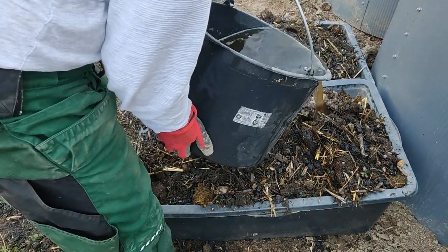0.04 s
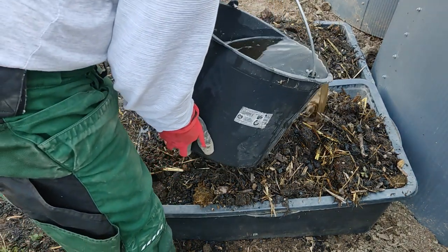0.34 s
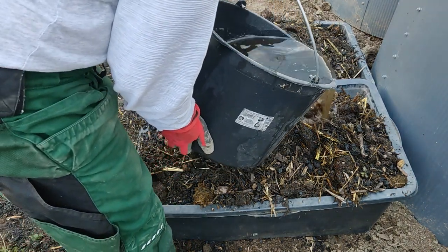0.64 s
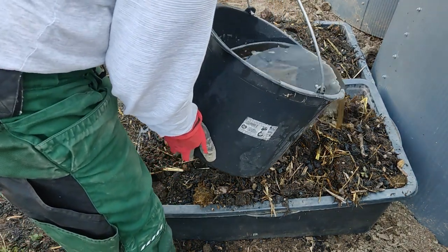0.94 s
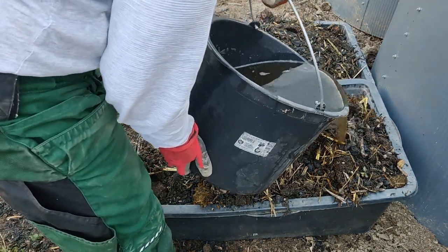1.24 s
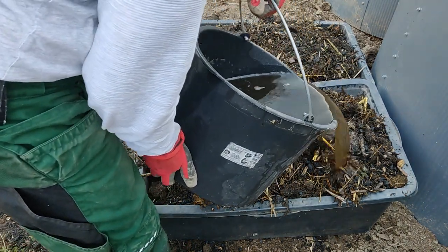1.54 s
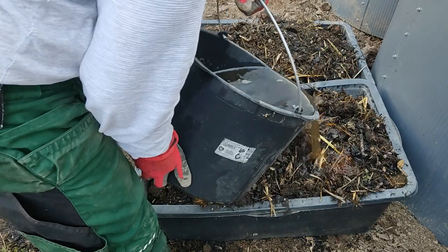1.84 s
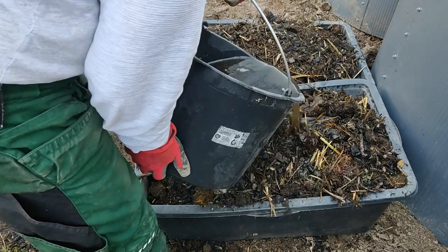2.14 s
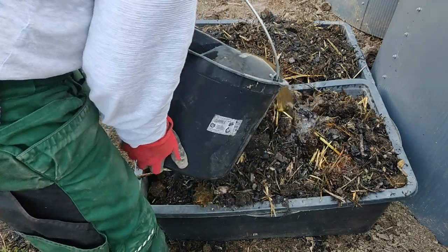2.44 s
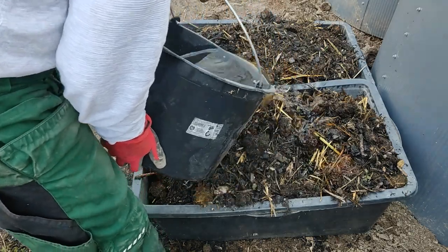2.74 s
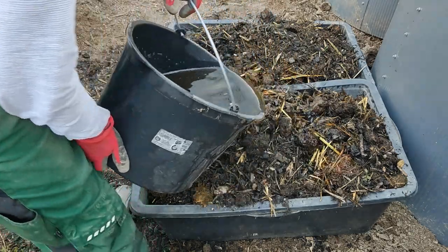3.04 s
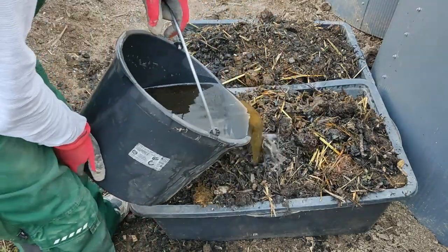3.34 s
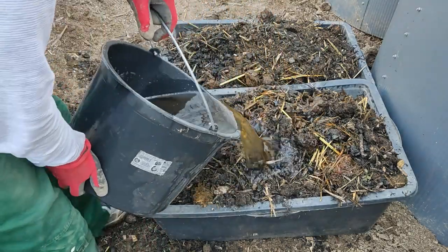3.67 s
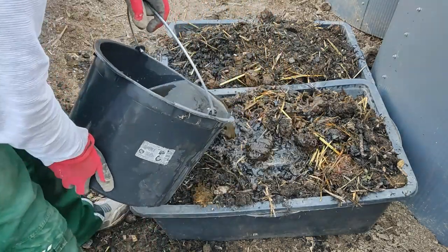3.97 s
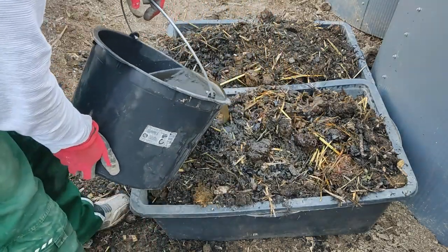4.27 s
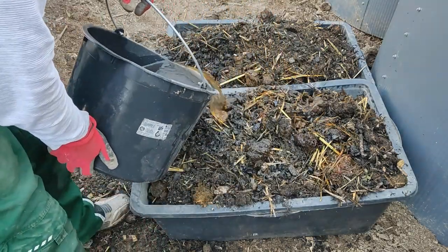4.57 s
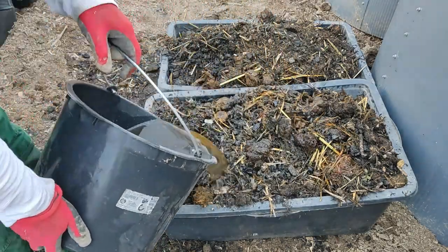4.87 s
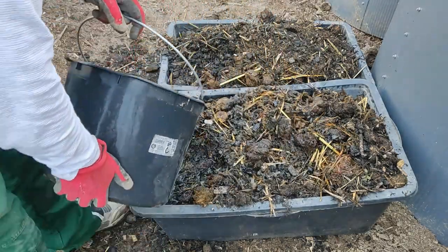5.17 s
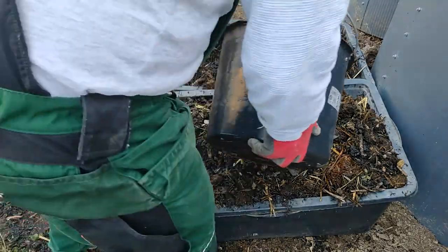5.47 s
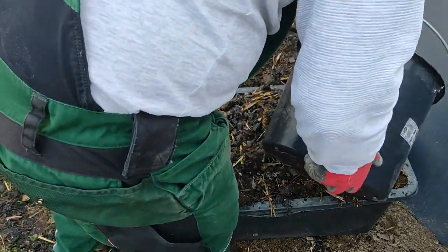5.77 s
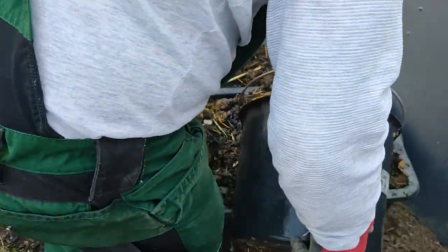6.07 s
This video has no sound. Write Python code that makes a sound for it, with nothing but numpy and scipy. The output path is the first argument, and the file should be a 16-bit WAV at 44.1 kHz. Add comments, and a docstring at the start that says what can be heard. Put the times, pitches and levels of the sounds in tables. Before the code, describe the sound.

Liquid pours from a plastic bucket onto straw and soil in a tub, about an arm's length away, outdoors. From the start it spatters brightly in uneven gushes, with fat drops, gurgling bubbles and a faint drumming on the tub. The flow eases near 3 seconds, a slop thumps softly into the tub at about 3.3, and the splashing swells again briefly. Around 4.6 seconds the stream thins to a quieter, fizzing trickle with ticking drips. From about 5 seconds, sleeve and glove fabric scrape in short rubs while the remaining liquid sloshes in the bucket. The plastic taps lightly at 5.3 and gives a hollow knock at about 6.2 seconds. Throughout, a distant engine revs up and down as a low hum, with a light breeze rumbling on the microphone.

```python
"""Outdoors, an arm's length from a tub of straw and soil: liquid is poured in from a plastic bucket.
The stream spatters on the straw, traps ringing bubbles and drums on the tub, then dies away to a
fizzing trickle. A slop thumps into the tub. As the bucket is swung round, cloth scrapes, the rest of
the liquid sloshes and the plastic knocks. A far engine revs up and down behind a light breeze."""
import sys
import numpy as np
from scipy import signal
from scipy.fft import rfft, irfft
from scipy.io import wavfile
from scipy.ndimage import uniform_filter1d, map_coordinates

SR = 44100
rng = np.random.default_rng(int(sys.argv[2]) if len(sys.argv) > 2 else 0)


def to_wav(s):
    """Save 16-bit WAV."""
    ch = np.atleast_2d(s).T  # columns
    pcm = np.round(np.clip(ch, -1, 1) * 32767)  # PCM
    wavfile.write(sys.argv[1], SR, pcm.astype(np.int16))


N = 278271
TIME_S = np.arange(N) / SR
STREAM_END_S = 4.59


def undb(db):
    """Decibels to gain."""
    return 10 ** (np.asarray(db) / 20)


def unit(x):
    """Scale to rms 1."""
    return x / np.sqrt(np.mean(x ** 2))


def curves(table):
    """Table columns, interpolated linearly over time."""
    time_s, *columns = np.transpose(table)
    return [np.interp(TIME_S, time_s, column) for column in columns]


def colour(x, spectrum, size=8192):
    """Minimum-phase filter through (freq_hz, gain_db) points."""
    hz, db = np.transpose(spectrum)
    log_hz = np.log(np.maximum(np.fft.rfftfreq(size, 1 / SR), 1))
    cepstrum = irfft(np.log(undb(np.interp(log_hz, np.log(hz), db))), size)
    cepstrum[1:size // 2] *= 2
    cepstrum[size // 2 + 1:] = 0
    response = irfft(np.exp(rfft(cepstrum)), size)
    return signal.oaconvolve(np.atleast_2d(x), response[None], axes=1)[:, :N]


def wander(rate_hz):
    """Smooth random drift, rms 1."""
    width = int(SR / rate_hz)
    return unit(uniform_filter1d(uniform_filter1d(rng.standard_normal(N), width), width))


def stereo_noise(side_db):
    """White noise, partly shared by both channels."""
    mid, side = rng.standard_normal((2, N))
    return unit(mid + undb(side_db) * side * np.array([[1], [-1]]))


def pan(pan_db):
    """Channel gains for a left-minus-right level."""
    return undb(np.array([[1], [-1]]) * pan_db / 2)


def add(out, start_s, sound):
    """Mix a sound in at start_s."""
    i = int(np.clip(start_s * SR, 0, N - 1))
    out[..., i:i + sound.shape[-1]] += sound[..., :N - i]


def strays(level_db, count):
    """Random events: start_s, level_db at that moment, three draws in 0-1."""
    return [(when * N / SR, level_db[int(when * N)], *draws) for when, *draws in rng.random((count, 4))]


def bubble(hz, cycles, glide, lag_ms):
    """Trapped air rings and decays, rising in pitch as it nears the surface."""
    t = np.arange(int(3 * cycles / hz * SR)) / SR
    delay_s = np.array([[max(-lag_ms, 0)], [max(lag_ms, 0)]]) / 1000
    turns = hz * np.maximum(t - delay_s, 0)
    age = turns / cycles
    return np.sin(2 * np.pi * turns * (1 + glide * age / 2)) * np.exp(-2 * age) * (1 - np.exp(-turns))


def bubble_crowd(count, low_hz, high_hz, cycles, glide, spread_db, cap, lag_ms):
    """Bubbles of uneven level at random times, small ones more often."""
    out = np.zeros((2, N))
    for when, pitch, size, life, place in rng.random((count, 5)):
        hz = low_hz * (high_hz / low_hz) ** np.sqrt(pitch)
        gain = undb(spread_db * min(-np.log(1 - size), cap))
        add(out, when * N / SR, gain * bubble(hz, cycles * (.5 + life), glide, lag_ms * (2 * place - 1)))
    return unit(out)


def gulps(swells, gain_db, octaves):
    """Swells of bubbles, each crowding round one pitch."""
    out = np.zeros((2, N))
    for peak_s, width_s, hz, db in swells:
        bubbles = bubble_crowd(count=1000, low_hz=hz / 2 ** octaves, high_hz=hz * 2 ** octaves,
                               cycles=7, glide=.03, spread_db=1.5, cap=2, lag_ms=.05)
        out += undb(db + gain_db) * bubbles * np.exp(-((TIME_S - peak_s) / width_s) ** 2)
    return out


def ticks(level_db, rate_hz, thinning, spread_db, cap, scatter_db, scatter_s, lag_ms):
    """Droplets tick on wet straw, fewer at low flow; the tub walls scatter each tick."""
    chance, size, place = rng.random(N), rng.exponential(size=N), rng.standard_normal(N)
    density = np.clip(rate_hz / SR * undb(thinning * (level_db - level_db.max())), 0, 1)
    polarity = np.sign(rng.standard_normal(N))
    hits = (chance < density) * polarity * undb(spread_db * np.minimum(size, cap)) / np.sqrt(density)
    right_arrival = np.clip(np.arange(N) + np.round(place * lag_ms * SR / 1000).astype(int), 0, N - 1)
    direct = unit(np.array([hits, np.bincount(right_arrival, hits, N)]))
    scatter_power = signal.lfilter([1], [1, -np.exp(-1 / (scatter_s * SR))], hits ** 2)
    scatter = np.sqrt(scatter_power) * rng.standard_normal((2, N))
    return direct + undb(scatter_db) * unit(scatter)


def struck_plastic(blows, modes, rattle_db):
    """A blow and a short rattle ring damped modes; soft blows miss the high ones."""
    out, t = np.zeros((2, N)), np.arange(SR // 5) / SR
    for start_s, db, cutoff_hz, rattle_s in blows:
        ring = np.zeros_like(t)
        for hz, mode_db, t60_s in modes:
            gain = undb(mode_db) / np.hypot(1, (hz / cutoff_hz) ** 3)
            ring += gain * np.sin(2 * np.pi * hz * t) * undb(-60 * t / t60_s)
        force = undb(rattle_db) * stereo_noise(side_db=-9)[:, :len(t)] * np.exp(-t / rattle_s) / 2
        force[:, 0] += 1
        add(out, start_s, undb(db) * signal.fftconvolve(force, ring[None]))
    return out


# Open-air spectrum: freq_hz, gain_db
AIR_SPECTRUM = [(15, -0.5), (28, -3), (50, -2.5), (100, -4), (150, -17.5), (300, -19), (700, -21),
                (2000, -28), (6000, -91), (15000, -49)]


def open_air(level_db=-57.5, swell_db=2):
    """Low, gently swelling outdoor rumble."""
    rumble = colour(stereo_noise(side_db=-3), AIR_SPECTRUM)
    return unit(rumble * undb(swell_db * wander(6.7))) * undb(level_db)


# Wind strength: time_s, level_db
WIND_GUSTS = [(0, -46), (.25, -51), (.55, -50), (1.25, -54.5), (1.45, -48.5), (1.8, -50), (2.15, -75),
              (2.45, -44.5), (2.7, -61), (2.9, -48), (3.2, -54), (3.75, -63), (4.3, -55), (4.65, -81),
              (5.0, -63), (5.4, -76), (5.8, -70), (6.3, -53)]


def breeze():
    """Gusts buffet each microphone port independently."""
    spectrum = [(10, 12.5), (24, 5), (45, 5), (80, -6), (200, -22), (600, -55)]
    level_db, = curves(WIND_GUSTS)
    return unit(colour(rng.standard_normal((2, N)), spectrum)) * undb(level_db)


# Engine revs: time_s, firing_hz
ENGINE_REVS = [(0.1, 63.6), (0.25, 56.5), (0.42, 50.6), (0.68, 36.5), (0.95, 40.5), (1.27, 36),
               (1.54, 45.5), (1.78, 46.8), (2.12, 63.6), (2.38, 49.5), (2.5, 47.3), (2.8, 33.4),
               (4.79, 33.6), (4.88, 46), (5.03, 56), (5.34, 55), (5.45, 34.6), (5.63, 48.4), (6.05, 47.8),
               (6.2, 54)]
# Off-throttle spans: start_s, end_s
ENGINE_COASTS = [(.5, 0.89), (2.53, 3.2), (5.36, 5.5)]


def far_engine(level_db=-53, coast_db=-6, third_db=-9, rumble_db=-6, wobble_db=2, muffle_hz=128):
    """Three exhaust harmonics carry this far; fundamental and rumble grow with the revs."""
    firing_hz, = curves(ENGINE_REVS)
    phase = 2 * np.pi * np.cumsum(firing_hz) / SR
    off_throttle = sum(1. * ((TIME_S > start_s) & (TIME_S < end_s)) for start_s, end_s in ENGINE_COASTS)
    coasting = uniform_filter1d(off_throttle, SR // 20)
    rev_gain = (firing_hz / 50.8) ** 3.8
    third_gain = undb(third_db) / np.hypot(1, (3 * firing_hz / muffle_hz) ** 8)
    tone = sum(gain * np.cos(k * phase) * undb(wobble_db * wander(9.6))
               for k, gain in enumerate([rev_gain, 1, third_gain], 1))
    spectrum = [(12, .5), (25, -34), (45, 5), (90, -11.5), (160, -11), (600, -57.5)]
    rumble = rev_gain * unit(colour(stereo_noise(side_db=-13), spectrum))
    return (np.sqrt(2) * tone + undb(rumble_db) * rumble) * undb(level_db + coast_db * coasting)


# Cloth rubs: peak_s, width_s, centre_hz, level_db
CLOTH_RUBS = [(5.037, 0.012, 2700, -49.5), (5.12, .04, 3800, -59), (5.22, 0.035, 2800, -56.5),
              (5.345, 0.012, 3700, -52), (5.40, 0.05, 4300, -57.5), (5.56, .06, 3800, -62),
              (5.8, .06, 3800, -63), (5.97, .07, 3000, -66), (6.16, .03, 3000, -64),
              (6.196, .007, 2300, -60), (6.232, .024, 2200, -57.5)]


def cloth_scrapes(grain_db=3.5):
    """Sleeve and glove rub in short, grainy swells."""
    out = np.zeros((2, N))
    for peak_s, width_s, hz, db in CLOTH_RUBS:
        grains = stereo_noise(side_db=-13) * undb(grain_db * wander(240))
        rub = unit(colour(grains, [(hz / 4, -24), (hz, 0), (hz * 2, -14)]))
        out += undb(db) * rub * np.exp(-2 * ((TIME_S - peak_s) / width_s) ** 2)
    return out


# Sloshes: peak_s, width_s, pitch_hz, level_db
BUCKET_SLOSHES = [(4.94, .03, 1600, -58), (5.045, .022, 1500, -54), (5.22, .03, 1700, -62),
                  (5.352, .016, 1300, -59), (5.585, 0.025, 1060, -66), (5.75, 0.035, 1050, -68)]


def bucket_sloshes():
    """The remaining liquid sloshes in the swung bucket."""
    return gulps(BUCKET_SLOSHES, gain_db=-1, octaves=.59)


# Blows on the bucket: start_s, level_db, cutoff_hz, rattle_s
BUCKET_BLOWS = [(5.338, -61, 900, .01), (5.354, -58.5, 1800, 0.012), (6.2055, -50.5, 1200, 0.014),
                (6.2115, -56, 890, 0.0054), (6.2185, -53, 904, 0.0097), (6.2295, -42.5, 380, 0.006),
                (6.2395, -48, 440, 0.005)]
# Bucket modes: freq_hz, gain_db, t60_s
BUCKET_MODES = [(225, 2, 0.085), (311, 0.5, .07), (370, -3, 0.045), (650, 3, 0.052), (760, -3, 0.031),
                (910, -1, 0.04), (1700, -11, .03), (2300, -11, .02)]


def bucket_knocks():
    """Light taps, then a hollow thud, ring the bucket."""
    return struck_plastic(BUCKET_BLOWS, BUCKET_MODES, rattle_db=-19)


# Slop impacts: start_s, level_db, cutoff_hz, rattle_s
SLOP_BLOWS = [(3.2595, -54, 850, 0.012), (3.266, -55, 1800, 0.018)]
# Tub wall modes: freq_hz, gain_db, t60_s
TUB_MODES = [(135, -7, 0.11), (208, 1, 0.047), (244, -2.5, 0.11), (327, -12, 0.073), (400, -12, 0.051),
             (510, 3, 0.014), (690, 5, 0.03), (800, 5, 0.055), (920, 5, 0.033), (1250, -8, 0.03),
             (1510, -9, 0.022), (2360, 18, 0.025)]


def tub_thump():
    """A slop lands and rings the tub wall."""
    return struck_plastic(SLOP_BLOWS, TUB_MODES, rattle_db=-15.5)


# Filled tub response: freq_hz, gain_db
TUB_SPECTRUM = [(100, -22.5), (165, -9.5), (205, 5.5), (245, -5), (330, -13.5), (425, -23.5), (457, -10.5),
                (490, -18.5), (600, -26.5), (1500, -43)]


def tub_drumming(stream_db=-59, dribble_db=-67, throb_db=2, fade_s=.15):
    """The stream drums on the tub, softer once it thins to a dribble."""
    level_db = np.interp(TIME_S, [STREAM_END_S, STREAM_END_S + fade_s], [stream_db, dribble_db])
    drone = colour(stereo_noise(side_db=-11), TUB_SPECTRUM)
    return unit(drone * undb(throb_db * wander(18))) * undb(level_db)


def dripping(gain_db=-62, onset_s=.39):
    """After the stream thins, soaked straw ticks with drips and bursting froth."""
    drips = ticks(np.zeros(N), rate_hz=220, thinning=0, spread_db=3.6, cap=2.6,
                  scatter_db=-3, scatter_s=.001, lag_ms=.1)
    spectrum = [(1000, -2), (2500, 1), (5000, 0), (9000, -10.5), (15000, 1.5)]
    fade_in = np.clip((TIME_S - STREAM_END_S) / onset_s, 0, 1)
    return colour(drips, spectrum) * undb(gain_db) * fade_in


# Tub resonance swells: peak_s, width_s, pitch_hz, level_db
TUB_RESONANCE_SWELLS = [(0.545, 0.078, 520, -61), (0.884, 0.26, 1130, -54.5), (0.9, 0.34, 456, -64),
                        (1.313, 0.049, 1060, -53.5), (1.954, 0.036, 850, -50), (2.207, 0.054, 813, -57),
                        (2.794, 0.092, 1660, -53.5), (3.44, 0.057, 880, -64.5), (3.752, 0.051, 850, -54.5)]


def tub_resonances():
    """Under the stream, the tub's fixed resonances ring out in narrow swells of bubbles."""
    return gulps(TUB_RESONANCE_SWELLS, gain_db=-2.5, octaves=.2)


# Large bubbles: start_s, pitch_hz, level_db
LARGE_BUBBLES = [(0.045, 2410, -29), (0.592, 1780, -30), (0.896, 1090, -34.5), (1.509, 1910, -31.5),
                 (1.935, 1160, -35.5), (2.216, 1090, -35.5), (2.78, 1740, -39), (2.87, 1630, -31.5),
                 (3.077, 1600, -38), (3.42, 880, -43), (3.904, 1680, -36.5), (3.921, 1080, -36),
                 (4.051, 1770, -35), (4.584, 990, -44), (4.699, 1320, -40), (4.782, 2770, -37),
                 (4.836, 920, -49), (4.898, 940, -42.5), (5.026, 2030, -40), (5.501, 840, -48.5),
                 (5.576, 1100, -41.5), (5.713, 1410, -35), (6.263, 2640, -38)]


def plops(gurgle_db, low_hz=1100, high_hz=2000, stray_db=8, spread_db=6):
    """Single large bubbles ring above the gurgle; weaker ones come at random."""
    out = np.zeros((2, N))
    weaker = [(start_s, low_hz * (high_hz / low_hz) ** pitch, db + stray_db - spread_db * weakness)
              for start_s, db, pitch, weakness, _ in strays(gurgle_db, count=70)]
    for start_s, hz, db in LARGE_BUBBLES + weaker:
        add(out, start_s, undb(db) * bubble(hz, cycles=11, glide=.052, lag_ms=.045))
    return out


# Puddle spectrum: freq_hz, gain_db
GURGLE_SPECTRUM = [(200, -23.5), (400, -10.5), (720, -17.5), (1150, -6), (2400, 1.5), (3500, 3.5),
                   (6000, 2.5), (12000, -59)]


def gurgle(level_db, gain_db=1.52, churn_db=9.5, clump_db=2):
    """The stream folds air into the puddle: short bubbles amid churning liquid."""
    bubbles = bubble_crowd(count=3200, low_hz=459.4, high_hz=2592,
                           cycles=16.5, glide=.087, spread_db=-4, cap=1.8, lag_ms=.12)
    churn = stereo_noise(side_db=-3) * undb(clump_db * wander(33))
    mix = unit(colour(bubbles, GURGLE_SPECTRUM)) + undb(churn_db) * unit(colour(churn, GURGLE_SPECTRUM))
    return unit(mix) * undb(level_db + gain_db)


# Pop clusters: start_s, level_db, centre_hz
WET_POPS = [(.032, -35, 2700), (.0605, -41, 3000), (.089, -36, 4600), (.182, -43, 2400), (.3155, -46, 3000),
            (.4284, -42, 2500), (.506, -41, 3900), (.6255, -44, 3000), (1.211, -46, 1400),
            (1.2958, -42, 3200), (1.3585, -42, 3400), (1.416, -40.5, 3500), (1.654, -43, 3000),
            (1.715, -47, 1300), (2.003, -41, 1900), (2.007, -44, 1100), (2.346, -44, 3200),
            (2.47, -44, 3800), (2.512, -44, 2500), (2.619, -42, 4100), (2.66, -45, 3300), (2.99, -48, 4600),
            (3.15, -46, 4400), (3.263, -44, 1300), (3.4385, -42, 3600), (3.722, -42, 2900),
            (3.752, -41, 4000), (3.805, -39, 3000), (3.818, -42, 3400), (4.319, -43.5, 4700),
            (4.393, -45, 3000), (4.6835, -49, 3500), (4.8537, -48, 4500), (4.9815, -41, 3800),
            (5.058, -53, 1200), (5.1015, -51, 3500), (5.249, -53, 1600), (5.318, -53, 2800),
            (5.357, -53, 2200), (5.473, -55, 2000), (5.5445, -53, 4200), (5.578, -53, 4300),
            (5.62, -56, 2500), (5.765, -55, 4800), (5.86, -56, 3800), (6.055, -57, 2100),
            (6.088, -55, 4200), (6.263, -50, 2800)]


def wet_pops(count=7, stagger_s=.0031, octaves=.31, rms_window_s=.005):
    """Short clusters of mid-pitched pops in the pour."""
    out = np.zeros((2, N))
    for start_s, db, centre_hz in WET_POPS:
        cluster = np.zeros((2, SR // 20))
        for k, (wait, pitch, place) in enumerate(rng.random((count, 3))):
            hz = centre_hz * 2 ** (octaves * (2 * pitch - 1))
            pop = bubble(hz, cycles=5, glide=.21, lag_ms=.12 * (2 * place - 1))
            add(cluster, k * wait * stagger_s, pop / (1 + k / 2))
        rms = np.sqrt(np.sum(cluster ** 2) / (2 * rms_window_s * SR))
        add(out, start_s, undb(db) * cluster / rms)
    return out


# Coarse drop spectrum: freq_hz, gain_db
CRACKLE_SPECTRUM = [(300, -25.5), (800, -7), (2000, 3.5), (3000, -3), (4200, 4), (6500, 11), (9000, -7),
                    (15000, -18.5)]
# Coarse patter level against the rest of the pour: time_s, offset_db
CRACKLE_LEVEL = [(0, -4), (.3, -4.5), (.55, -5), (1.1, -0.5), (1.55, -1.5), (1.9, -14), (2.08, -2),
                 (2.45, -0.5), (3.0, 1.5), (3.33, 1), (3.62, -3.5), (3.8, -0.5), (4.4, 2), (4.7, 1),
                 (4.95, 1.5), (5.6, -0.5), (6.3, 3)]


def crackle(spray_db, gurgle_db, beads_db=-1.5, clump_db=3.1):
    """Coarse drops patter and trap small beads of air."""
    offset_db, = curves(CRACKLE_LEVEL)
    level_db = (spray_db + gurgle_db) / 2 + offset_db
    patter = ticks(level_db, rate_hz=600, thinning=.3, spread_db=3.6, cap=2.4,
                   scatter_db=-5, scatter_s=.0015, lag_ms=.02)
    beads = bubble_crowd(count=1500, low_hz=2200, high_hz=6400,
                         cycles=10, glide=.02, spread_db=2.8, cap=2.4, lag_ms=.06)
    mix = unit(colour(patter, CRACKLE_SPECTRUM)) + undb(beads_db) * beads
    return unit(mix * undb(clump_db * wander(19))) * undb(level_db)


# Fine droplet spectrum: freq_hz, gain_db
SPRAY_SPECTRUM = [(1500, -67), (4000, -9), (6000, -13), (8000, 4.5), (15000, -2)]


def spray(level_db, gain_db=-3, froth_db=-3.5, clump_db=1):
    """Fine droplets tick and froth pings; full flow blurs them into a hiss."""
    fizz = ticks(level_db, rate_hz=6000, thinning=.8, spread_db=3, cap=3.2,
                 scatter_db=4, scatter_s=.0022, lag_ms=.12)
    froth = bubble_crowd(count=3000, low_hz=6000, high_hz=14000,
                         cycles=22, glide=.01, spread_db=3.2, cap=2.8, lag_ms=.15)
    mix = unit(colour(fizz, SPRAY_SPECTRUM)) + undb(froth_db) * froth
    return unit(mix * undb(clump_db * wander(61))) * undb(level_db + gain_db)


def drop_envelope(attack_ms=.17, decay_ms=.62, second_ms=1.4, second_db=-11, spray_ms=4, spray_db=-27):
    """A drop bursts, strikes a second stalk and throws a little spray."""
    t_ms = np.arange(SR // 20) * 1000 / SR
    first, second = [(1 - np.exp(-age_ms / attack_ms)) * np.exp(-age_ms / decay_ms)
                     for age_ms in (t_ms, np.maximum(t_ms - second_ms, 0))]
    return first + undb(second_db) * second + undb(spray_db) * np.exp(-t_ms / spray_ms)


# Fat drops on straw: start_s, level_db, body_db, pan_db
FAT_DROPS = [(.0892, -13.5, -16, -7), (.162, -22, -20, 0), (.436, -21, -18, 0), (.457, -21, -16, 3),
             (.4637, -15.5, -16, 3), (.6238, -15, -21, -7), (.78, -22, -23, -3), (.7832, -14, -19, 0),
             (.787, -20, -24, 0), (.797, -22, -22, 0), (.9816, -23, -22, 0), (1.0624, -20.5, -22, 0),
             (1.181, -23.5, -23, 0), (1.235, -22, -15, -9), (1.422, -20.5, -23, -1), (1.457, -16, -25, -5),
             (1.464, -22, -22, 0), (1.5414, -21, -21, 0), (1.5687, -24.5, -24, 0), (1.7204, -22, -22, 0),
             (1.7808, -16.5, -28, -5), (1.79, -21, -24, 0), (1.7975, -22, -24, 0), (1.859, -22, -24, 0),
             (1.8764, -16, -24, 0), (1.924, -21, -18, 0), (1.935, -22, -8, 0), (1.9887, -7, -25, 3),
             (2.0985, -24.5, -22, 0), (2.1545, -19, -16, -4), (2.2245, -16.5, -14, 2),
             (2.433, -22.5, -13, -3), (2.445, -22, -18, 0), (2.765, -27, -18, 0), (2.878, -24.5, -20, 0),
             (3.256, -12, -30, -7), (3.3046, -21.5, -19, -8), (3.3835, -20.5, -18, -2),
             (3.4515, -22, -20, 0), (3.5253, -22, -14, 0), (3.67, -21, -18, 0), (3.6887, -18.5, -21, -4),
             (3.803, -25, -9, 0), (3.808, -21, -11, 0), (3.817, -24, -10, 0), (3.914, -23, -9, 3),
             (3.989, -18.5, -26, 2), (4.0873, -14.5, -8, -2), (4.0987, -20.5, -12, 5),
             (4.1105, -23, -10, -5), (4.117, -26, -11, 0), (4.1355, -23, -28, -3), (4.1693, -30, -22, 0),
             (4.211, -25.5, -25, 2), (4.2277, -24.5, -24, 0), (4.2808, -25, -14, 0),
             (4.283, -21.5, -12, -3), (4.4977, -19, -22, -4), (4.626, -24.5, -24, 3), (4.8987, -31, -22, 0),
             (4.918, -25, -26, -4), (4.9502, -26, -15, -1), (4.9815, -21, -9, 0), (5.009, -17.5, -28, -1),
             (5.0618, -29.5, -20, 0), (5.507, -35, -15, 0), (5.7265, -38, -17, 0), (5.8066, -35, -16, 0),
             (5.9548, -35, -22, 0), (5.9733, -32, -20, 2), (5.9895, -33, -23, 0), (6.006, -31, -11, 3),
             (6.1214, -37.5, -20, 0), (6.2965, -39, -18, 0)]


def drops(spray_db, snap_gain_db=-6.6, body_gain_db=1, stray_db=10.5, spread_db=6, width_db=6):
    """Fat drops burst in a bright snap with more or less body; smaller ones fall at random."""
    snap, body = np.zeros((2, 2, N))
    burst = drop_envelope()
    smaller = [(start_s, db + stray_db - spread_db * weakness, -7 - 12 * thin, width_db * (2 * place - 1))
               for start_s, db, weakness, thin, place in strays(spray_db, count=130)]
    for start_s, db, body_db, pan_db in FAT_DROPS + smaller:
        add(snap, start_s, undb(db + snap_gain_db) * pan(pan_db) * burst)
        add(body, start_s, undb(db + body_db + body_gain_db) * pan(pan_db) * burst)
    snap *= np.sign(stereo_noise(side_db=-3))
    body *= np.sign(stereo_noise(side_db=-9.5))
    return colour(snap, SPRAY_SPECTRUM) + colour(body, CRACKLE_SPECTRUM)


# Steady flow: time_s, spray_db
STEADY_FLOW = [(0, -42.5), (.14, -45), (.24, -46.5), (.55, -40.5), (.88, -43.5), (1.1, -41.5), (1.6, -43.5),
               (1.9, -41.5), (2.05, -44), (2.36, -43), (2.66, -46.5), (3.0, -49), (3.3, -48), (3.47, -44.5),
               (3.78, -45.5), (4.2, -56), (4.42, -48.5), (4.8, -53.5), (5.35, -58.5), (5.65, -61),
               (5.9, -63), (6.31, -60)]
# Gushes over the lip: start_s, length_s, spray_db, gurgle_db
LIP_GUSHES = [(0.01, 0.028, -38, -42), (0.127, 0.023, -43, -43.5), (0.408, 0.061, -38.5, -40),
              (0.485, 0.11, -72, -43.5), (0.71, 0.11, -48, -46), (0.944, 0.026, -50, -43.5),
              (1.316, 0.031, -48, -45.5), (1.693, 0.03, -41.5, -73), (1.767, 0.18, -57, -44.5),
              (1.88, 0.076, -42.5, -42), (2.153, 0.067, -38.5, -41), (2.227, 0.091, -61, -46.5),
              (2.767, 0.087, -65, -50), (3.362, 0.072, -45.5, -52), (3.622, 0.19, -46, -47),
              (3.894, 0.043, -57, -47.5), (4.028, 0.026, -52, -48.5), (4.089, 0.037, -46, -49),
              (4.355, 0.056, -47.5, -49), (4.466, 0.032, -47, -43.5), (4.615, 0.082, -50, -66),
              (4.997, 0.093, -51.5, -60), (5.421, 0.12, -54.5, -55.5), (5.687, 0.17, -61.5, -60.5)]


def pour_levels(gurgle_ref_db=-53, flow_ref_db=-48.5, gurgle_slope=.89, attack_s=.032, release_s=.045):
    """Spray and gurgle levels follow the flow, flutter, and swell as swaying liquid gushes out."""
    flow_db, = curves(STEADY_FLOW)
    flutter_db = 1.48 * wander(18)
    gulp_db = 2.3 * wander(30)
    steady_gurgle_db = gurgle_ref_db + gurgle_slope * (flow_db - flow_ref_db)
    spray_power = undb(flow_db + flutter_db) ** 2
    gurgle_power = undb(steady_gurgle_db + flutter_db + gulp_db) ** 2
    for start_s, length_s, spray_db, gurgle_db in LIP_GUSHES:
        age_s = TIME_S - start_s
        swell = np.clip(age_s / attack_s, 0, 1) * np.exp(-np.maximum(age_s - length_s, 0) / release_s)
        spray_power += (undb(spray_db) * swell) ** 2
        gurgle_power += (undb(gurgle_db) * swell) ** 2
    return 10 * np.log10(spray_power), 10 * np.log10(gurgle_power)


# Where the stream lands: time_s, pan_db, left_lead_ms
LANDING_PATH = [(0, 1.5, 0.095), (1, 1, 0.1), (2.7, 1, 0.057), (3.6, -0.5, 0.0019), (4.3, 1.5, -0.017),
                (5.2, 0.5, -0.087), (5.6, 2.5, 0.2), (6.3, 3, 0.23)]


def at_landing_spot(sound):
    """The landing spot wanders, shifting level and arrival time between channels."""
    pan_db, lead_ms = curves(LANDING_PATH)
    right = map_coordinates(sound[1], [np.arange(N) - lead_ms * SR / 1000], order=3)
    return np.array([sound[0], right]) * pan(pan_db)


def scene():
    """The pour in front; engine, breeze and open air behind."""
    spray_db, gurgle_db = pour_levels()
    tub_ringing, sloshes = tub_resonances(), bucket_sloshes()
    stream = spray(spray_db) + crackle(spray_db, gurgle_db) + gurgle(gurgle_db) + plops(gurgle_db)
    pour = at_landing_spot(stream + wet_pops() + tub_ringing + dripping())
    plastic = tub_thump() + bucket_knocks()
    foreground = pour + sloshes + drops(spray_db) + tub_drumming() + plastic + cloth_scrapes()
    return foreground + far_engine() + breeze() + open_air()


# Microphone port responses: freq_hz, gain_db
LEFT_RESPONSE = [(100, 1), (6000, -6.5), (8200, 4), (9700, 4), (11000, 13), (12300, 4), (14000, -3.5)]
RIGHT_RESPONSE = [(100, 1), (6000, -5.5), (7400, 5), (8500, 13.5), (9700, 8), (11000, -1.5), (14000, -7.5)]


def record(dry):
    """Each microphone port has its own treble resonance; a steep low-pass cuts the top."""
    cutoff_hz = 14400
    heard = np.vstack([colour(dry[0], LEFT_RESPONSE), colour(dry[1], RIGHT_RESPONSE)])
    return signal.sosfilt(signal.ellip(10, .2, 70, cutoff_hz, fs=SR, output="sos"), heard)


dry = scene()
out = record(dry)
to_wav(out)
```